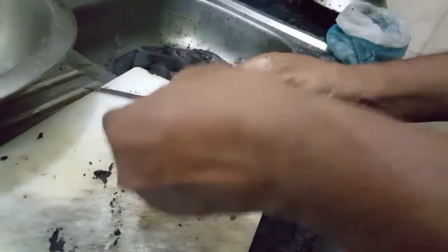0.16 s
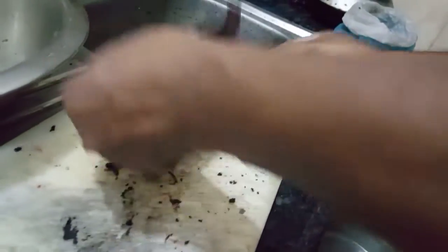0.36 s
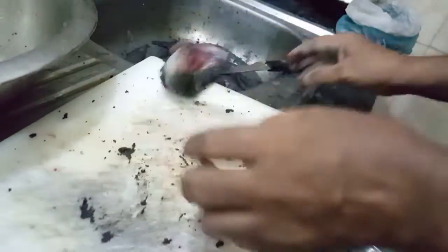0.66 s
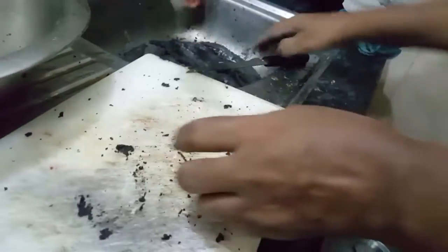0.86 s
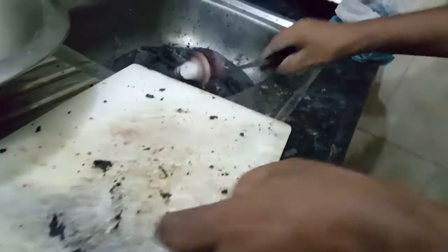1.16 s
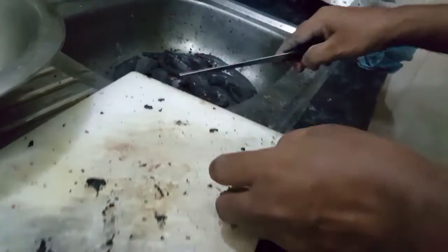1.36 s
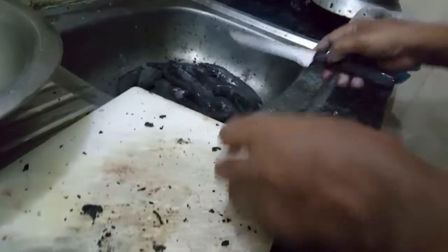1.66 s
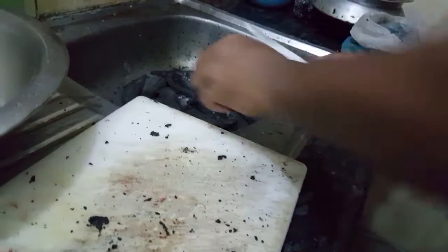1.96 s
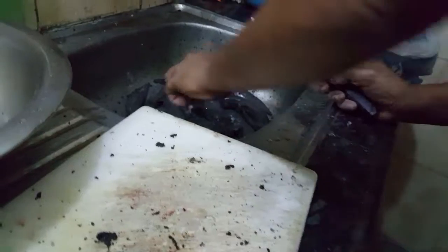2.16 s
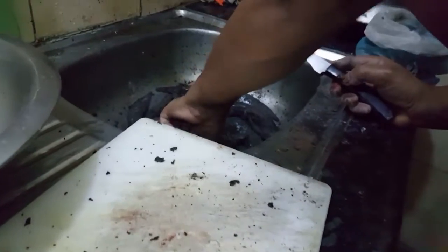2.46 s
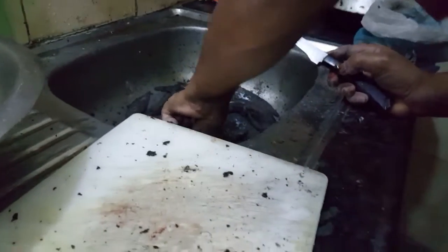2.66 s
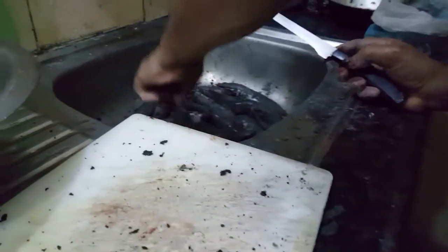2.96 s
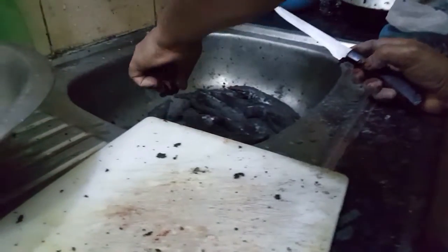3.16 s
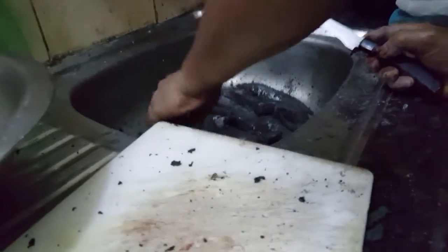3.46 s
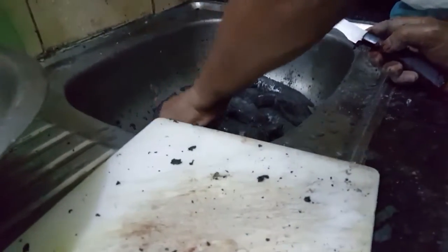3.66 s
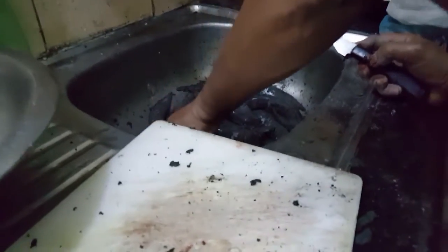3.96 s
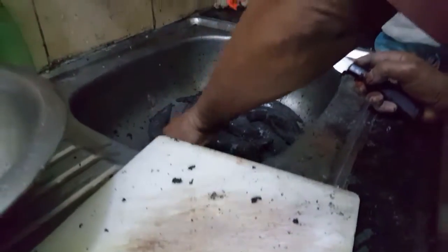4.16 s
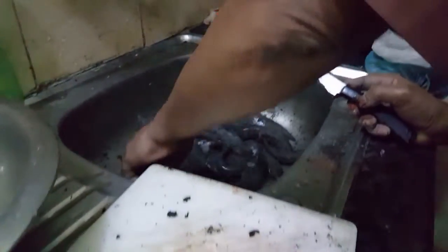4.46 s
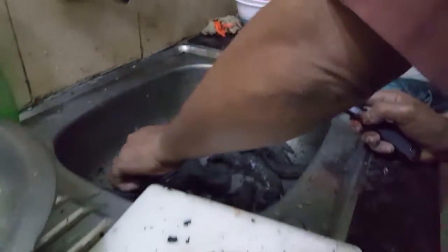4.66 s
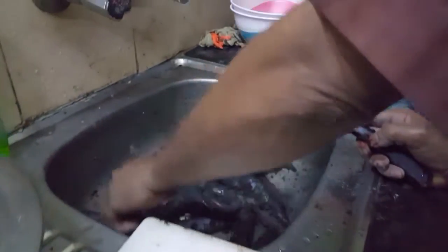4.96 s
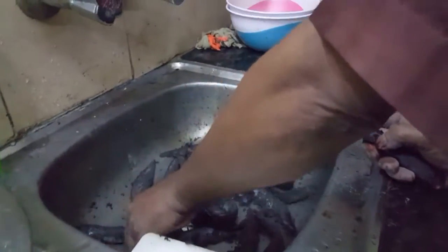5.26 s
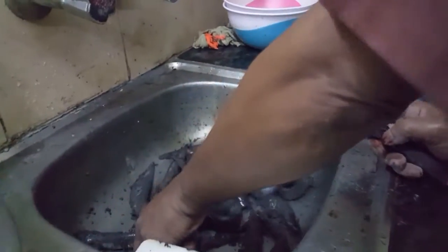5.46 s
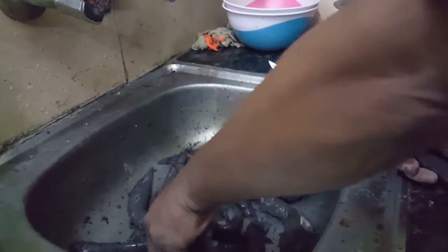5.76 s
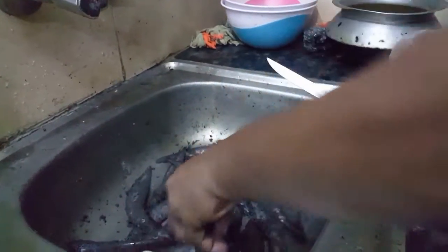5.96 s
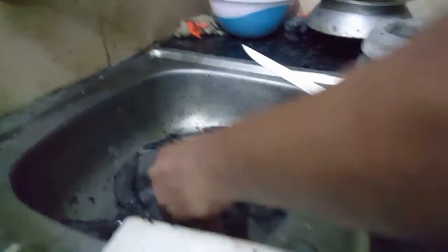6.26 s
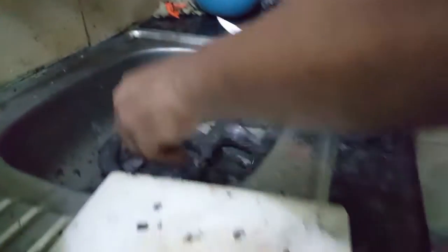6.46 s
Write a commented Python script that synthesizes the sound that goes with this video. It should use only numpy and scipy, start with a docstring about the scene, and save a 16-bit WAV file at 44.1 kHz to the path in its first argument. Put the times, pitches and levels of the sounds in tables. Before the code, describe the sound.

Sharp steel-and-plastic knocks burst out for a second and a half, then soft wet slaps, squelches and dull basin bumps over a steady hum.

```python
"""A low hum and a faint hiss, then at once knife and fish knock and skid on a steel sink and a plastic board that rocks.
Then a hand strokes through the wet fish, slaps, squeaks, bumps the basin and knocks the board again in a small tiled kitchen.
Hum is wavering sine lines over rumble; wet sounds are coloured noise and ringing bubbles; bumps are low decaying cycles.
Each blow is a coloured click with chatter, board clack, ringing steel modes and a room tail; skids are bursts of blows."""
import sys
import numpy as np
from scipy import signal
from scipy.fft import rfft, irfft, next_fast_len
from scipy.io import wavfile
from scipy.ndimage import map_coordinates

SR = 44100
rng = np.random.default_rng(int(sys.argv[2]) if len(sys.argv) > 2 else 0)


def to_wav(s):
    """Save 16-bit WAV."""
    ch = np.atleast_2d(s).T  # columns
    pcm = np.round(np.clip(ch, -1, 1) * 32767)  # PCM
    wavfile.write(sys.argv[1], SR, pcm.astype(np.int16))


N = 291501  # length in samples


def amp(db):
    """Decibels to gain."""
    return 10 ** (np.asarray(db) / 20)


def unit(x):
    """Scale to rms 1."""
    return x / np.sqrt(np.mean(x ** 2) + 1e-20)


def along(points, hz):
    """Read (f/Hz, value) points on a log frequency axis."""
    f, value = np.transpose(points)
    return np.interp(np.log(hz + 1), np.log(f + 1), value)


def curves(rows):
    """One value per sample for each column after the time."""
    s, *columns = np.transpose(rows)
    return [np.interp(np.arange(N) / SR, s, column) for column in columns]


def wobble(rate):
    """A smooth random curve, rate knots a second."""
    knots = rng.standard_normal(int(N * rate / SR) + 4)
    return map_coordinates(knots, [np.arange(N) * rate / SR])


def glide(start, length, attack, release):
    """Speed of a sliding movement: it picks up, holds and dies away (all in s)."""
    t = np.arange(N) / SR - start
    return np.clip(t / attack, 0, 1) * np.exp(-np.maximum(t - length, 0) / release)


def filtered(x, response):
    """Shape the spectrum of x by a response of frequency."""
    n = x.shape[-1]
    m = next_fast_len(n + 4096)
    return irfft(rfft(x, m) * response(np.fft.rfftfreq(m, 1 / SR)), m)[..., :n]


def causal(x, gain_db, size=2048):
    """Colour x by a dB function of frequency, with no sound ahead of the attack."""
    cepstrum = irfft(np.log(amp(gain_db(np.fft.rfftfreq(size, 1 / SR)))))
    # fold the cepstrum forward in time: minimum phase
    cepstrum[1:size // 2] *= 2
    cepstrum[size // 2 + 1:] = 0
    impulse = irfft(np.exp(rfft(cepstrum)))
    return signal.fftconvolve(x, impulse[None], axes=1)[:, :x.shape[1]]


# likeness of left and right in a diffuse field: (f/Hz, correlation)
STEREO_LIKENESS = [(100, 0.97), (300, 0.77), (800, 0.47), (2300, 0.054)]


def spread(pair):
    """Two unrelated signals become a diffuse field: bass alike, treble nearly unrelated."""
    turn = lambda hz: np.arccos(np.clip(along(STEREO_LIKENESS, hz), -1, 1)) / 2
    mid, side = filtered(pair, lambda hz: np.array([np.cos(turn(hz)), np.sin(turn(hz))]))
    return np.array([mid + side, mid - side])


def noise(n):
    """Diffuse white stereo noise."""
    return spread(rng.standard_normal((2, n)))


def pan(x, left_db):
    """Lean a sound left, by the level difference between the channels."""
    return x * amp([[left_db / 2], [-left_db / 2]])


def add(track, s, x):
    """Mix x into the track at time s."""
    start = int(np.clip(round(s * SR), 0, N - 1))
    track[:, start:start + x.shape[1]] += x[:, :N - start]


# decay of the tiled kitchen: (f/Hz, t60/s)
KITCHEN_DECAY = [(200, 1), (1000, 0.38), (4000, 0.3), (12000, 0.37)]


def room_tail(n):
    """The kitchen's answer to a click, energy about 1 a channel; the bass lasts longest."""
    hz, t, grid = signal.stft(noise(n), SR, nperseg=256)
    decay = amp(-60 * t / along(KITCHEN_DECAY, hz)[:, None])
    tail = signal.istft(grid * decay, SR, nperseg=256)[1][:, :n]
    return unit(tail) / np.sqrt(n)


# colour of the background hiss: (f/Hz, relative level/dB)
AIR_COLOUR = [(300, -14), (1000, 3.5), (2600, -1.5), (5000, -15.5), (14000, -38)]


def air(level_db=-58):
    """A faint, gently swelling hiss made of shaped diffuse noise."""
    hiss = unit(filtered(noise(N), lambda f: amp(along(AIR_COLOUR, f))))
    return amp(level_db + 2.3 * wobble(6.6)) * hiss


# colour of the low rumble: (f/Hz, relative level/dB)
RUMBLE_COLOUR = [(25, -29), (75, -10), (110, -10.5), (170, -8), (290, -5.5), (380, -12.5), (620, -21),
                 (1500, -38)]
# motor and mains lines, before their small waver: (f/Hz, level/dB)
HUM_LINES = [(112, -52.5), (177, -59.5), (297, -53)]
# path of a wavering low tone: (t/s, f/Hz, level/dB)
DRONE_PATH = [(.7, 208.5, -52), (1.8, 206.8, -43.5), (2.1, 219.7, -46.5), (2.4, 222, -75),
              (6.1, 217.6, -47.5)]


def hum(rumble_db=-47, waver_hz=1.36):
    """Motor and mains lines over a low rumble; one tone wavers, swells and fades."""
    tone = lambda hz: np.sqrt(2) * np.sin(2 * np.pi * np.cumsum(hz) / SR)  # rms 1
    lines = sum(amp(db + wobble(4.3)) * tone(hz + waver_hz * wobble(12)) for hz, db in HUM_LINES)
    pitch, level = curves(DRONE_PATH)
    drone = amp(level + 1.8 * wobble(14)) * tone(pitch + 4 * wobble(25))
    rumble = amp(rumble_db) * unit(filtered(noise(N), lambda f: amp(along(RUMBLE_COLOUR, f))))
    return pan(lines + drone + rumble, left_db=1.16)


# fingers squeaking on wet steel: (t/s, length/s, level/dB, mean slip rate f/Hz)
FINGER_SQUEAKS = [(3.677, .07, -44, 509), (6.296, 0.11, -50, 1525)]
# weight of the squeak's harmonics: (f/Hz, relative level/dB)
SQUEAK_COLOUR = [(500, -28), (1000, -5), (1550, 1), (2550, -2), (3200, -19)]


def squeaks(harmonics=6, jitter_hz=22):
    """Skin sticks and slips at a slightly uneven rate; the room answers."""
    out, t = np.zeros((2, N)), np.arange(SR // 4) / SR
    for s, length, db, hz in FINGER_SQUEAKS:
        phase = 2 * np.pi * np.cumsum(hz + jitter_hz * wobble(400)[:len(t)]) / SR
        tone = sum(amp(along(SQUEAK_COLOUR, k * hz)) * np.sin(k * phase) for k in range(1, harmonics + 1))
        grip = amp(4 * wobble(380)[:len(t)])  # the wet grip flutters
        swell = np.sin(np.pi * np.minimum(t / length, 1) ** 0.6) ** 2
        slip = amp(db) * unit(tone) * grip * swell
        echo = signal.fftconvolve(slip[None], room_tail(len(t)), axes=1)[:, :len(t)]
        add(out, s, slip + .5 * echo)
    return out


# soft bumps on the basin floor: (t/s, level/dB before the shared trim, f/Hz)
BASIN_BUMPS = [(0.929, -27, 126), (1.214, -27.5, 122), (1.466, -26.5, 117), (4.533, -33.5, 120),
               (4.932, -21.5, 122), (5.208, -29.5, 116), (5.722, -22, 190), (5.779, -24.5, 183),
               (6.48, -24, 106), (6.585, -23.5, 112)]


def bumps(trim_db=6, t60=0.12, rise_s=0.015, basin_hz=122, basin_db=-6, thud_db=-8, after_db=-26, after_t60=1.0):
    """The loaded basin answers a soft push with low cycles, its own deep note and a dull, lingering thud."""
    out, t = np.zeros((2, N)), np.arange(SR // 2) / SR
    thud_colour = [(40, -29), (90, 23.5), (200, 13), (3000, -17)]  # (f/Hz, relative level/dB)
    for s, db, hz in BASIN_BUMPS:
        basin_note = amp(basin_db) * np.sin(2 * np.pi * basin_hz * t)
        swing = unit(np.sin(2 * np.pi * hz * t) + basin_note) / np.sqrt(2)
        thud = unit(filtered(noise(len(t)), lambda f: amp(along(thud_colour, f))))
        push = amp(-60 * t / t60) * (swing + amp(thud_db) * thud)
        linger = amp(after_db - 60 * t / after_t60) * thud
        add(out, s, amp(db + trim_db) * (1 - np.exp(-(t / rise_s) ** 2)) * (push + linger))
    return pan(out, left_db=1.5)


# wet fish slapping: (t/s, level/dB before the shared trim, pocket pitch f/Hz)
WET_SLAPS = [(2.45, -33.5, 1000), (3.023, -37, 2010), (3.305, -31, 1360), (3.335, -28.5, 980),
             (3.356, -32.5, 980), (4.1, -35.5, 1500), (4.555, -33, 2780), (4.616, -35, 2150),
             (4.938, -28, 1750), (5.219, -37.5, 2400), (5.726, -37, 900)]
# base colour of a contact, for slaps and blows alike: (f/Hz, relative level/dB)
CONTACT_COLOUR = [(50, -41), (300, -11), (720, -2), (2900, -2), (10000, -20.5), (15000, -32.5)]


def slaps(trim_db=-10, t60=0.27, tick_db=4, tick_t60=0.013, pitch_db=11):
    """Wet flesh smacks: a tick and a crackly burst, coloured by the pocket it closes."""
    out, t = np.zeros((2, N)), np.arange(SR // 4) / SR
    decay = amp(-60 * t / t60) + amp(tick_db - 60 * t / tick_t60)
    for s, db, hz in WET_SLAPS:
        burst = noise(len(t)) * amp(2 * rng.standard_normal(len(t)))
        pocket = lambda f: along(CONTACT_COLOUR, f) + pitch_db / (1 + ((f - hz) / (0.22 * hz)) ** 2)
        add(out, s, amp(db + trim_db) * decay * unit(causal(burst, pocket)))
    return pan(out, left_db=2.0)


def pops(per_s=220, hz=1900, cycles=14):
    """Tiny air pockets burst in the slime, each ringing briefly at its own pitch."""
    draws, t = rng.random((3000, 3)), np.arange(SR // 50) / SR
    start = (np.cumsum(-np.log(1 - draws[:, 0])) / per_s * SR).astype(int)
    turns = hz * 2 ** (2 * draws[:, 1:2] - 1) * t  # up to an octave either way
    size = -np.log(1 - draws[:, 2:])
    ring = size * np.sin(2 * np.pi * turns) * amp(-60 * turns / (2 * cycles))
    place = start[:, None] + np.arange(len(t))
    return unit(np.bincount(place.ravel(), ring.ravel(), N)[:N])


# the hand strokes through the wet fish: (t/s, length/s, squelch level/dB, sticky squish level/dB)
HAND_STROKES = [(0.155, 0.13, -46.5, -51), (1.633, .17, -57.5, -61), (1.882, 0.2, -56.5, -56),
                (2.376, 0.18, -53.5, -52), (2.84, 0.2, -57.5, -59), (3.164, .08, -68, -53.5),
                (3.332, 0.064, -57, -45), (3.802, 0.17, -55, -48), (4.01, 0.085, -52.5, -71),
                (4.377, 0.12, -52.5, -50), (4.572, 0.074, -55.5, -70), (4.877, 0.12, -55.5, -67),
                (6.019, 0.16, -58.5, -59.5)]
# colour of the squelch: (f/Hz, relative level/dB)
SQUELCH_COLOUR = [(300, -3), (850, 6.5), (1400, -8), (2350, 0.5), (3700, -1), (7000, -33)]
# colour of the wet hiss: (f/Hz, relative level/dB)
HISS_COLOUR = [(1500, 16.1), (8000, 12.5), (14000, 8.7)]
STROKE_ATTACK_S, STROKE_RELEASE_S = 0.042, 0.048
SKID_ATTACK_S, SKID_RELEASE_S = 0.032, 0.014
SQUISH_HZ, SQUISH_WIDTH_HZ = 2220, 380  # the wet pocket between fingers and skin
HISS_BASE_DB, HISS_GROWS = -30, 0.4  # the wet hiss grows more slowly with pressure than the squelch
SKID_SQUELCH_DB = -22  # under the scrape


def rummage(grain_db=-8, sticks_per_s=500, grip_db=1.1, crackle_db=-6):
    """Strokes and skids rub wet skin: a sticky, crackling rush swells with the grip and squishes."""
    squelch, squish, hiss = np.zeros((3, N))
    for s, length, squelch_db, squish_db in HAND_STROKES:
        speed = glide(s, length, STROKE_ATTACK_S, STROKE_RELEASE_S)
        squelch += amp(squelch_db) * speed
        squish += amp(squish_db) * speed
        hiss += amp(HISS_BASE_DB + HISS_GROWS * squelch_db) * speed
    for s, length, _, _, scrape_db in FISH_SKIDS:
        speed = glide(s, length, SKID_ATTACK_S, SKID_RELEASE_S)
        squelch += amp(scrape_db + SKID_SQUELCH_DB) * speed
        hiss += amp(scrape_db) * speed
    stick_size = amp(3 * rng.exponential(size=N).clip(0, 2))
    sticks = (rng.random(N) < sticks_per_s / SR) * stick_size * rng.standard_normal((2, N))
    skin = lambda: noise(N) + amp(grain_db) * unit(spread(np.array([pops(), pops()])))
    flutter = amp(1.5 * wobble(40))
    resonance = lambda f: 1 / (1 + 1j * (f - SQUISH_HZ) / (2 * SQUISH_WIDTH_HZ)) ** 2
    body = squelch * unit(filtered(skin(), lambda f: amp(along(SQUELCH_COLOUR, f))))
    pocket = squish * unit(filtered(skin(), resonance))
    crackle = noise(N) + amp(crackle_db) * unit(sticks)
    fizz = hiss * unit(filtered(crackle, lambda f: amp(along(HISS_COLOUR, f))))
    wet = pan(flutter * (body + pocket), left_db=6.0)
    return amp(grip_db * wobble(22)) * (wet + pan(fizz, left_db=1))


def board_clack(t, hz, t60=0.025, lower=0.616, lower_db=-3):
    """The plastic board gives a few strong cycles, their pitch set by the spot that is struck."""
    cycles = np.sin(2 * np.pi * hz * t) + amp(lower_db) * np.sin(2 * np.pi * lower * hz * t)
    return unit(cycles * amp(-60 * t / t60) * (1 - np.exp(-t * hz)))


# the struck steel panel, around its note: (multiple of the note, level/dB, t60/s)
PANEL_MODES = [(1.001, 6, 0.13), (1.09, -9, 0.22), (1.237, -5, 0.11)]
# the rest of the basin: (f/Hz, level/dB, t60/s)
BASIN_MODES = [(1710, -11, 0.22), (2231, 3, 0.041), (2490, -6, 0.067), (4310, -14, 0.16)]
BOARD_OVER_PANEL = 2.4  # the board's note follows the spot that is struck, as the panel's does


def blow(t, walls, panel_hz, chatter_t60=0.024, chatter_db=2.5, ring_db=-3, board_db=-4, room_db=3,
         ripple_db=3, lead_s=0.00015, count=90):
    """One contact: a click, brief chatter, the board's clack, the ringing steel and the room."""
    click = np.zeros((2, len(t)))
    click[0, 0] = click[1, int(lead_s * SR)] = 1  # the left leads
    chatter = unit(noise(len(t)) * amp(-60 * t / chatter_t60)) / np.sqrt(len(t))
    panel = [(k * panel_hz, db, t60) for k, db, t60 in PANEL_MODES]
    hz, db, t60 = np.transpose(panel + BASIN_MODES)[:, :, None]
    # each mode takes a few cycles to build up; the load on the steel shifts it slightly
    strength = amp(db + 2.5 * rng.standard_normal(hz.shape) - 60 * t / t60) * (1 - np.exp(-t * hz / 2))
    hz = hz * (1 + .008 * rng.standard_normal(hz.shape))
    phase = rng.standard_normal((2, len(hz), 1)) * np.minimum(hz / 2500, 2)
    ear_time = t - np.array([0, lead_s])[:, None, None]
    ring = np.sum(strength * np.sin(2 * np.pi * hz * ear_time + phase), axis=1)
    # each spot favours its own short-lived modes
    ripple = ripple_db * rng.uniform(-np.sqrt(3), np.sqrt(3), count)
    uneven = lambda f: np.interp(f, np.linspace(0, SR / 2, count), ripple) * np.minimum(f / 1000, 1)
    colour = lambda f: along(CONTACT_COLOUR, f) + uneven(f)
    echo = (walls + room_tail(len(t))) / np.sqrt(2)  # blows land close together and share half their echo
    crack = causal(click + amp(chatter_db) * chatter + amp(room_db) * echo, colour)
    clack = board_clack(t, BOARD_OVER_PANEL * panel_hz)
    board = signal.fftconvolve(click, clack[None], axes=1)[:, :len(t)]
    return unit(crack) + amp(board_db) * board + amp(ring_db) * unit(ring)


def weigh(hit, boom, clack, bite, snap):
    """Where and how hard a blow lands sets the level of its boom, clack, bite and snap (dB)."""
    bands = [(600, 950), (1100, 2200), (2300, 4000), (4200, 14000)]  # Hz
    attack = round(.03 * SR)
    hz = np.fft.rfftfreq(attack, 1 / SR)
    power = 2 * np.abs(rfft(hit[:, :attack].mean(0)) / attack) ** 2
    own = [10 * np.log10(power[(hz > lo) & (hz < hi)].sum()) for lo, hi in bands]
    low, mid, upper, high = np.array([boom, clack, bite, snap]) - own
    gains = [(300, (low + mid) / 2), (650, low), (880, low), (1200, mid), (1900, mid),
             (2600, upper), (3400, upper), (5200, high)]
    return causal(hit, lambda f: along(gains, f))


# a fish skids over board and steel: (t/s, length/s, boom level/dB, clack level/dB, scrape level/dB)
FISH_SKIDS = [(0.131, 0.02, -65, -70, -29.5), (0.348, 0.071, -25, -31, -35),
              (0.911, 0.036, -35.5, -39, -28.5), (6.424, .05, -39, -38, -53)]
SKID_BITE_DB, SKID_SNAP_DB = -9.5, -13.5  # under the clack


def skids(walls, catches_per_s=190, scatter_db=2.0, panel_hz=790, spots=3):
    """A skidding fish catches and slips in quick, uneven succession at a few spots: a dense crunch."""
    out, t = np.zeros((2, N)), np.arange(SR // 4) / SR
    for s, length, boom, clack, _ in FISH_SKIDS:
        for _ in range(spots):
            spot_hz = panel_hz * np.exp(0.05 * rng.standard_normal())
            hit = weigh(blow(t, walls, spot_hz), boom, clack, clack + SKID_BITE_DB, clack + SKID_SNAP_DB)
            when = (np.arange(32) + rng.random(32)) * spots / catches_per_s
            size = amp(scatter_db * rng.standard_normal(32))
            size = size * (when < length) * np.minimum(1.5 + when / SKID_ATTACK_S, 1)
            catches = np.bincount((when * SR).astype(int), size)
            catches = catches / (np.linalg.norm(size) * np.sqrt(spots) + 1e-9)
            add(out, s, signal.fftconvolve(hit, catches[None], axes=1))
    return out


# knife and fish striking board and sink:
# (t/s, low boom level/dB, mid clack level/dB, upper bite level/dB, treble snap level/dB)
KNIFE_AND_FISH_KNOCKS = [(.1431, -68, -43.5, -41.5, -49.5), (.18, -51.5, -43.5, -45.5, -41.5),
                         (.3645, -39, -31, -40, -51), (0.3739, -21.5, -35, -42, -44),
                         (0.3899, -48, -24, -29.5, -42), (.402, -33, -31.5, -29, -34.5),
                         (.4195, -32, -39, -35, -46), (0.444, -28.5, -23.5, -29.5, -39),
                         (.459, -35, -25.5, -33.5, -35), (.5145, -30, -34.5, -35, -45),
                         (0.5327, -28, -29.5, -36, -41.5), (.544, -40, -36, -36, -45),
                         (0.5516, -29.5, -30.5, -34, -34), (.5806, -35, -33, -36.5, -37.5),
                         (.6449, -39, -39, -47, -50), (.6906, -35, -42, -42.5, -47),
                         (.734, -36.5, -32.5, -43, -49), (0.7825, -48, -47, -39.5, -51.5),
                         (.833, -46, -43.5, -43.5, -59), (0.8738, -28.5, -32.5, -45, -50),
                         (0.9073, -33.5, -25, -33.5, -39), (0.9181, -44, -33.5, -28.5, -31.5),
                         (0.9786, -32, -36, -37.5, -42.5), (1.0224, -40.5, -33, -46, -62),
                         (1.1284, -53, -51, -48, -61), (1.1505, -39, -39.5, -43, -48.5),
                         (1.198, -42, -34, -46.5, -49), (1.252, -41.5, -38.5, -50, -53),
                         (1.3596, -31.5, -34, -35, -35.5), (1.4188, -37.5, -42.5, -44.5, -51),
                         (1.4671, -42, -42.5, -47.5, -57), (1.5157, -39.5, -42.5, -48.5, -52.5),
                         (1.5477, -40, -45.5, -54.5, -60), (6.352, -34.5, -38, -38.5, -38),
                         (6.4165, -28.5, -29.5, -32.5, -46.5), (6.549, -45, -49, -46.5, -51),
                         (6.5978, -37.5, -38.5, -46.5, -82)]
# the steel's note shifts with the spot that is struck: (t/s, f/Hz)
STRUCK_NOTE = [(.4, 768.6), (.69, 694), (.874, 786), (.98, 703), (1.6, 706.5), (6.35, 816)]


def knocks(walls):
    """Single blows of knife and fish, and the taps of the board rocking after them."""
    out, t = np.zeros((2, N)), np.arange(SR // 4) / SR
    for s, *levels in KNIFE_AND_FISH_KNOCKS:
        note_hz = np.interp(s, *np.transpose(STRUCK_NOTE))
        add(out, s, weigh(blow(t, walls, note_hz), *levels))
    return out


# how far the clatter leans left: (f/Hz, left over right level/dB)
CLATTER_LEAN = [(600, 1.4), (2000, 7), (6000, 2.5)]


def scene():
    """Everything at the sink, heard from just above the board."""
    walls = room_tail(SR // 4)
    lean = lambda f: amp(np.outer([.5, -.5], along(CLATTER_LEAN, f)))
    clatter = filtered(knocks(walls) + skids(walls), lean)
    return air() + hum() + squeaks() + bumps() + slaps() + rummage() + clatter


TOP_HZ = 14700  # band limit


def record(dry):
    """Loud cracks are rounded off, and a very steep filter removes what lies above the band limit."""
    rounded = dry / (1 + np.abs(dry / .9) ** 6) ** (1 / 6)
    return filtered(rounded, lambda hz: 1 / np.sqrt(1 + (hz / TOP_HZ) ** 160))


dry = scene()
out = record(dry)
to_wav(out)
```